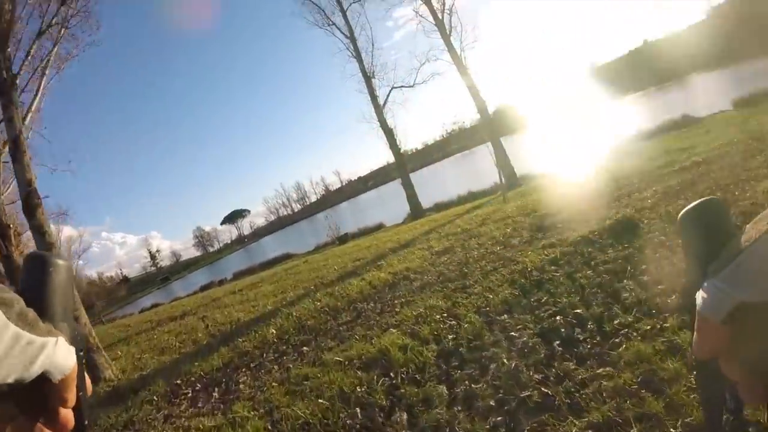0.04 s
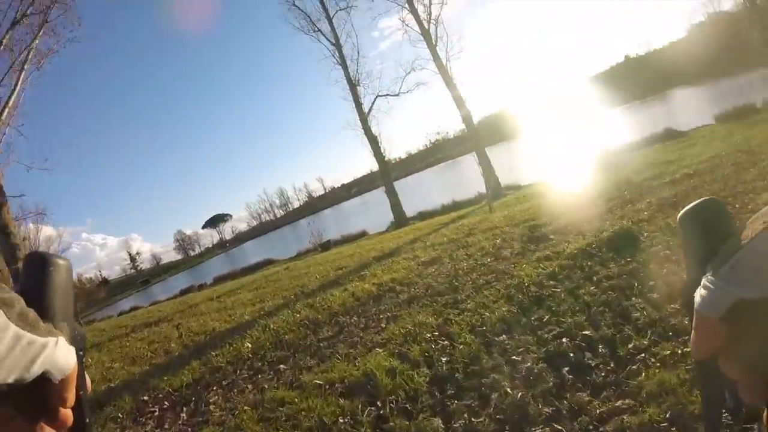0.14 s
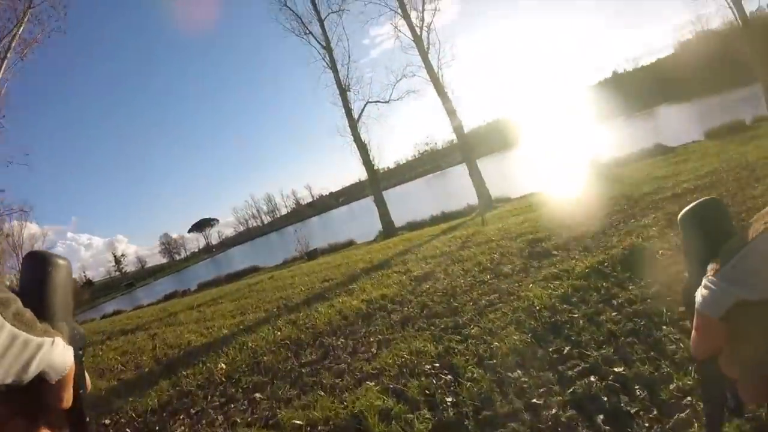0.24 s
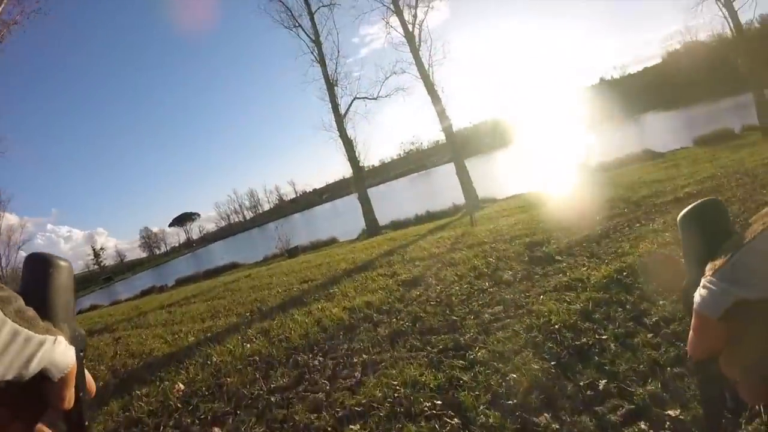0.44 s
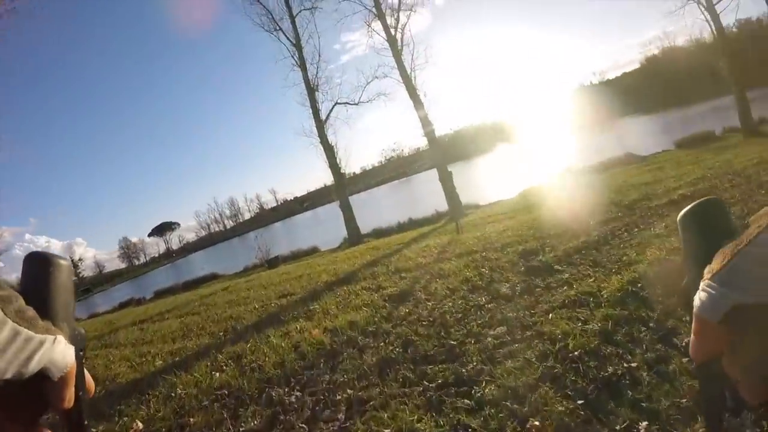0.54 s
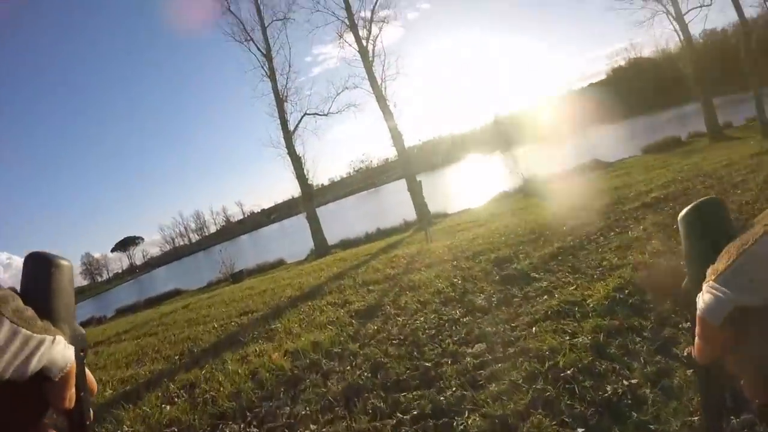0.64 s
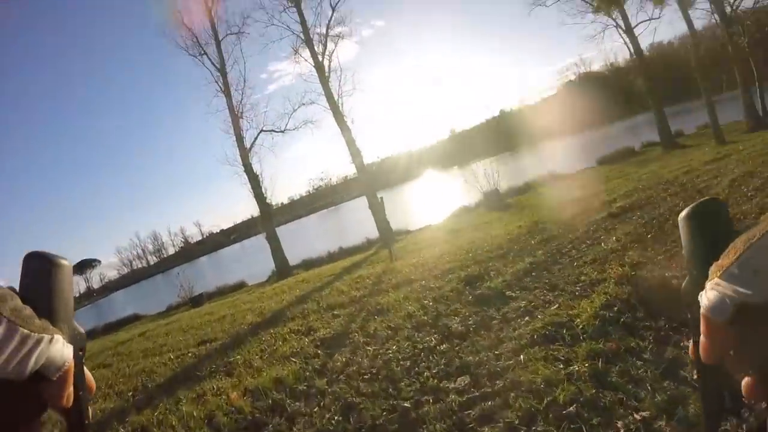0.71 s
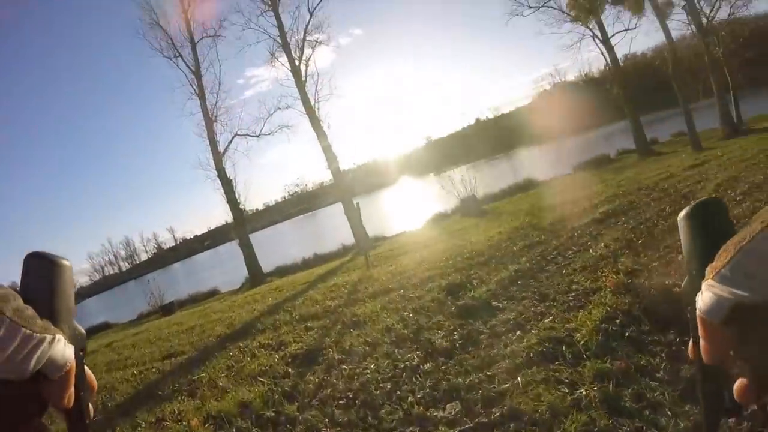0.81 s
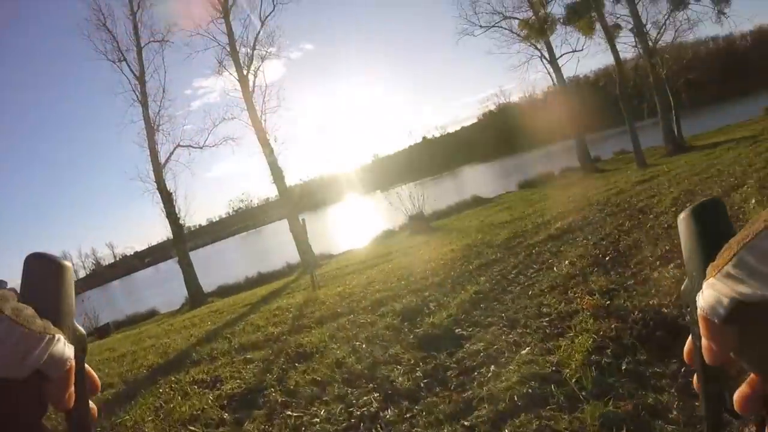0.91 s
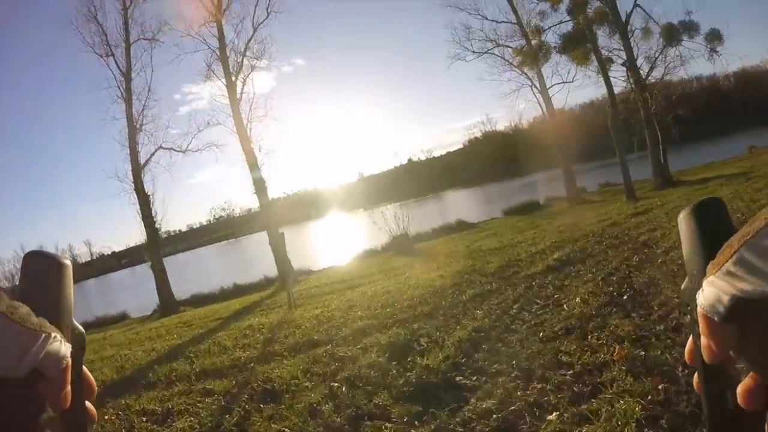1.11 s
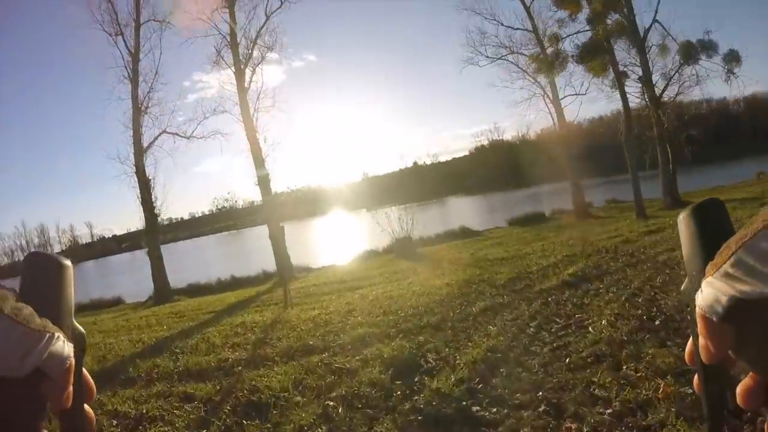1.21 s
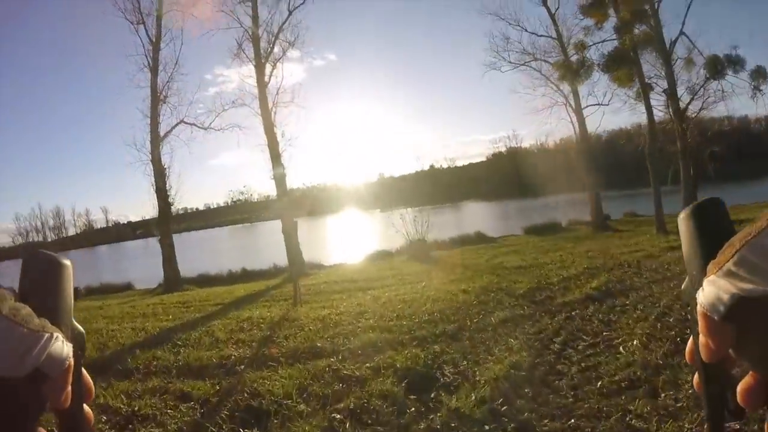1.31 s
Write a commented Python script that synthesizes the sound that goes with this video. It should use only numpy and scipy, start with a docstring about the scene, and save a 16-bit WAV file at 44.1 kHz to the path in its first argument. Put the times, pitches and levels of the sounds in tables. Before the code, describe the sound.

A bicycle rolls over bumpy grass. Dull thumps and a quick clatter of loose parts come first, then softer bumps with small snaps of leaves and twigs. Tyres and light wind rumble on a microphone carried by the rider.

```python
"""Bicycle on bumpy grass and dead leaves.

Heard from a camera in a closed case on the rider, all but mono. Bumps thump the camera mount and
knock loose parts of the bike. The tyres rumble, grass rustles, twigs and leaves snap.
Light wind rumbles on the case; a rubbing part whines faintly at the start."""
import sys
import numpy as np
from scipy import signal
from scipy.fft import rfft, irfft, next_fast_len
from scipy.io import wavfile
from scipy.ndimage import uniform_filter1d, map_coordinates

SR = 44100
rng = np.random.default_rng(int(sys.argv[2]) if len(sys.argv) > 2 else 0)


def generate_wav(signal):
    """Clip the signal to [-1, 1] and save it as 16-bit WAV at the path in sys.argv[1]."""
    frames = np.transpose(np.atleast_2d(signal))
    scaled = np.clip(frames, -1, 1) * 32767
    pcm = np.round(scaled).astype(np.int16)
    wavfile.write(sys.argv[1], SR, pcm)


N = 59535

# Mount swings. Each row: peak time in seconds, level in dB, pitch in Hz, rise and t60 in seconds.
MOUNT_THUMPS = [(0.121, -43, 132.8, 0.021, 0.28), (0.15, -43, 130, 0.012, 0.054),
                (0.2299, -29.5, 147.5, 0.013, 0.16), (0.289, -21.5, 135.4, 0.017, 0.12),
                (0.3941, -25.5, 140, 0.0071, 0.056), (.401, -29, 122.6, 0.0096, 0.063),
                (0.602, -43, 135, 0.0092, 0.11), (0.6985, -30.5, 132.2, 0.022, 0.11),
                (0.7813, -40, 134.2, 0.011, 0.092), (0.8506, -44, 142.5, 0.045, 0.068),
                (0.8959, -45, 123, 0.0076, 0.082), (0.9996, -40.5, 132.5, 0.0068, 0.077),
                (1.164, -53.5, 143.5, 0.042, 0.17), (1.248, -51.5, 123, 0.027, 0.15)]
# Loose parts. Each row: peak time in seconds, base level in dB, base pitch in Hz, rise in seconds.
PART_KNOCKS = [(0.2193, -19, 524, 0.0028), (.229, -33.5, 603, 0.0065), (.263, -39, 703, 0.0055),
               (.284, -30, 270, 0.0051), (.3035, -31.5, 848, 0.0031), (.3072, -36, 846, 0.0019),
               (0.3135, -31, 744, 0.0013), (0.316, -26, 324, 0.0035), (.3262, -33, 622, 0.0067),
               (.341, -37.5, 618, 0.0047), (0.384, -38.5, 490, 0.0085), (.5, -51, 594, 0.0053),
               (0.6716, -39, 666, 0.0046), (.799, -44, 780, 0.0051), (.884, -49.5, 833, 0.011),
               (.917, -47, 488, 0.0054), (.92, -45, 846, 0.003), (.936, -42, 790, 0.0012),
               (.957, -44, 660, 0.0068), (.971, -47.5, 462, 0.0062), (1.301, -51.5, 550, 0.0031)]
# Modes of a knock. Each row: pitch ratio, gain in dB, t60 in rise times.
KNOCK_MODES = [(0.621, -13, 4.8), (0.998, -4, 5.7), (1.45, -33, 9.4)]
# Twigs and leaves. Each row: start in seconds, peak in dB before the low-pass, pitch in Hz,
# resonance width over pitch.
TWIG_SNAPS = [(0.1965, -42.5, 5780, 0.34), (0.324, -52, 1257, 0.3), (0.3747, -63.5, 9500, 0.18),
              (.5395, -67, 9000, 0.66), (0.543, -47, 6450, 0.74), (0.5624, -53.5, 9400, 0.33),
              (0.6764, -41.5, 2020, 1), (0.732, -57, 4280, 0.27), (0.748, -57, 5370, 0.089),
              (0.8233, -52, 3600, 0.47), (0.845, -41, 3900, 0.92), (0.8526, -41.5, 5440, .9),
              (0.9459, -54, 2660, 0.15), (1.0581, -45.5, 3080, 0.12), (1.0579, -46.5, 3950, .5),
              (1.098, -52, 6700, 0.081), (1.1806, -45, 7040, 0.38), (1.1868, -42.5, 2340, 0.44),
              (1.208, -47.5, 3180, 1)]
# Grass blades. Each row: peak time in seconds, gain in dB, rise and fall time constants in seconds,
# low-pass in Hz.
BLADE_SWISHES = [(.002, -60.5, 0.014, 0.022, 13100), (0.203, -57.5, 0.017, 0.02, 7700),
                 (0.391, -74, 0.0079, 0.011, 12000), (0.541, -58.5, 0.0025, 0.018, 14700),
                 (0.621, -64.5, 0.0041, 0.0084, 13600), (0.685, -62, 0.0036, 0.0098, 12200),
                 (1.248, -60.5, 0.0059, 0.0069, 10200)]
# Rubbing tones. Each row: start in seconds, starting pitch in Hz, level in dB, rise and t60 in seconds.
WHINE_TONES = [(0, 815, -54, 0.048, 0.15), (.005, 1045, -63.5, 0.05, 0.28),
               (0.052, 1693, -76.5, 0.046, 0.56), (.1, 550, -51.5, 0.062, 0.11)]
# Noise envelopes. Each row: time in seconds, level in dB.
TYRE_ENVELOPE = [(0, -56.5), (.055, -59), (.105, -58.5), (.15, -62), (.2, -57), (.295, -54), (.325, -45.5),
                 (.372, -59.5), (.4, -53.5), (.44, -64.5), (.478, -80), (.51, -65.5), (.55, -60.5),
                 (.65, -60), (.7, -54), (.76, -64.5), (.81, -58.5), (.86, -59), (.95, -56.5), (1.005, -58),
                 (1.05, -69), (1.19, -62), (1.296, -72.5), (1.305, -59.5), (1.35, -66)]
RUSTLE_ENVELOPE = [(0, -74.5), (.12, -82), (.24, -78), (.4, -88), (.45, -96.5), (.52, -85), (.56, -71),
                   (.59, -76.5), (.674, -72), (.68, -57), (.73, -67.5), (.785, -69), (.835, -56),
                   (.87, -62), (.925, -65.5), (.975, -75), (1.05, -66), (1.11, -62), (1.155, -72),
                   (1.183, -58), (1.212, -67.5), (1.27, -71.5), (1.325, -85), (1.342, -63.5)]
WIND_ENVELOPE = [(0, -65.5), (.18, -61), (.24, -49.5), (.3, -43.5), (.36, -65), (.405, -46.5), (.5, -72.5),
                 (.72, -50.5), (.85, -60), (1.08, -65), (1.22, -59.5), (1.35, -63)]
# Noise colours. Each row: frequency in Hz, relative gain in dB.
TYRE_COLOUR = [(60, -30), (130, 7.5), (210, -4.5), (340, 1), (480, 4), (630, 1.5), (730, -1.5), (880, 2),
               (1050, -21.5), (1400, -24.5), (2500, -34), (6000, -87)]
RUSTLE_COLOUR = [(600, -0.5), (1200, -0.5), (2200, -0.5), (2900, 4.5), (5000, 0.5), (7300, 1.5),
                 (8600, -11.5), (10300, -6.5), (12000, -20), (14500, -18.5)]
SWISH_COLOUR = [(1500, -10.5), (3500, -13), (4300, -6), (5100, 5), (7200, -3), (8600, -7), (10300, -4),
                (12000, -18), (14500, -8)]
WIND_COLOUR = [(12, -24.5), (28, -10.5), (48, 1.5), (75, -6.5), (130, 1.5), (220, -20.5), (600, -71)]


def mount_thumps(overtone_ratio=2.25, overtone_db=-22, overtone_t60_s=0.14):
    """Each bump swings the camera mount at its low resonance, with a weak overtone."""
    out = np.zeros(N)
    for peak_s, db, hz, rise_s, t60_s in MOUNT_THUMPS:
        overtone = amp(overtone_db) * ring(peak_s, hz * overtone_ratio, rise_s, overtone_t60_s)
        out += amp(db) * (ring(peak_s, hz, rise_s, t60_s) + overtone)
    return out


def part_knocks(top_hz=1115):
    """Loose parts knock in damped modes, dulled on the way. Slow, rubbing contacts ring longer."""
    hits = np.zeros(N)
    for peak_s, db, hz, rise_s in PART_KNOCKS:
        for ratio, mode_db, t60_rises in KNOCK_MODES:
            hits += amp(db + mode_db) * ring(peak_s, hz * ratio, rise_s, rise_s * t60_rises)
    return filtered(hits, lambda f: 1 / np.sqrt(1 + (f / top_hz) ** 20))


def tyre_rumble(uneven_db=1.9):
    """Rough ground shakes the frame through the tyres: a dull, uneven rumble."""
    shaking = rng.standard_normal(N) * amp(uneven_db * wobble(90))
    return envelope(TYRE_ENVELOPE) * coloured(shaking, TYRE_COLOUR)


def twig_snaps(splinter_db=-11.5):
    """A twig or dry leaf breaks in a short burst: one resonance over a wideband crack."""
    out = np.zeros(N)
    for start_s, db, hz, width in TWIG_SNAPS:
        burst = rng.standard_normal(N) * strike(clock() - start_s, rise_s=0.00055, t60_s=0.01)
        band_hz = width * hz
        body = filtered(burst, lambda f: (1j * f * band_hz / (hz * hz - f * f + 1j * f * band_hz)) ** 2)
        snap = unit(body) + amp(splinter_db) * coloured(burst, RUSTLE_COLOUR)
        out += amp(db) * snap / np.abs(snap).max()
    return lowpass(out, top_hz=12900)


def leaf_rustle():
    """Leaves and grass crackle under the tyres."""
    return envelope(RUSTLE_ENVELOPE) * coloured(crackle(), RUSTLE_COLOUR)


def blade_swishes():
    """Grass blades brush past the wheel, some brighter than others."""
    t, out = clock(), np.zeros(N)
    blades = coloured(crackle(), SWISH_COLOUR)
    for peak_s, db, rise_s, fall_s, top_hz in BLADE_SWISHES:
        swell = np.exp(-np.maximum((peak_s - t) / rise_s, (t - peak_s) / fall_s))
        out += amp(db) * swell * lowpass(blades, top_hz)
    return out


def crackle(clumps_per_s=800, ticks_per_clump=4, clump_s=0.003, t60_s=0.007, tick_share=0.4):
    """Each crushed leaf gives a clump of tiny ticks ringing near its own pitch, over a soft hiss."""
    low_hz, high_hz, detune_octaves = 970, 11000, 0.6
    spread_db, flutter_db = 2.6, 0.76
    hiss = rng.standard_normal(N)
    flutter = amp(flutter_db * wobble(170))
    draws = rng.random((int(clumps_per_s * N / SR), ticks_per_clump + 1, 3))
    start, size, pitch = np.repeat(draws[:, 0], ticks_per_clump, axis=0).T[:, :, None]  # per leaf
    lag, detune, phase = draws[:, 1:].reshape(-1, 3).T[:, :, None]  # per tick
    age = np.arange(400)  # samples
    hz = (low_hz + pitch * (high_hz - low_hz)) * 2 ** (detune_octaves * (detune - 0.5))
    size_db = spread_db * np.minimum(-np.log(1 - size), 3)
    ticks = amp(size_db - 60 * age / SR / t60_s) * np.sin(2 * np.pi * (hz * age / SR + phase))
    onset = (start * N + lag * clump_s * SR).astype(int)
    ticking = np.bincount((onset + age).ravel(), ticks.ravel(), N)[:N]
    blend = np.sqrt(tick_share) * unit(ticking) + np.sqrt(1 - tick_share) * hiss
    return patchy(blend) * flutter


def patchy(x, depth_db=2):
    """The colour of a rustle shifts from tuft to tuft."""
    spectra = signal.stft(x, nperseg=256)[2]
    patches = uniform_filter1d(rng.standard_normal(spectra.shape), size=4, axis=0)  # over frequency
    patches = uniform_filter1d(patches, size=8, axis=1)  # over time
    return signal.istft(spectra * amp(depth_db * unit(patches)), nperseg=256)[1][:N]


def case_wind():
    """Air rumbles on the case, most when the rider is jolted."""
    return envelope(WIND_ENVELOPE) * coloured(rng.standard_normal(N), WIND_COLOUR)


def rub_whine(climb_per_s=0.65, waver_rad=1, rough_db=3):
    """Something on the bike rubs and sings briefly: faint, rough, rising in pitch."""
    out = np.zeros(N)
    for start_s, hz, db, rise_s, t60_s in WHINE_TONES:
        t = clock() - start_s
        phase = 2 * np.pi * hz * t * (1 + climb_per_s * t / 2) + waver_rad * wobble(110)
        out += amp(db + rough_db * wobble(110)) * strike(t, rise_s, t60_s) * np.sin(phase)
    return out


def ring(peak_s, hz, rise_s, t60_s):
    """One damped mode, loudest at peak_s."""
    t = clock() - peak_s
    return strike(t + rise_s, rise_s, t60_s) * np.cos(2 * np.pi * hz * t)


def strike(t, rise_s, t60_s):
    """Smooth rise from t = 0, then exponential decay."""
    attack = np.sin(np.pi / 2 * np.clip(t / rise_s, 0, 1)) ** 2
    return attack * amp(-60 * np.maximum(t - rise_s, 0) / t60_s)


def envelope(points):
    """Gain per sample from (s, dB) points."""
    return amp(np.interp(clock(), *np.transpose(points)))


def wobble(knots_per_s):
    """Smooth random curve."""
    return map_coordinates(rng.standard_normal(2048), [clock() * knots_per_s], mode="mirror")


def coloured(x, points):
    """x shaped by (Hz, dB) points, at rms 1."""
    hz, db = np.transpose(points)
    return unit(filtered(x, lambda f: amp(np.interp(np.log(f + 1), np.log(hz), db))))


def filtered(x, response):
    """x through a frequency response, a function of Hz."""
    size = next_fast_len(N + 8192)
    return irfft(rfft(x, size) * response(np.fft.rfftfreq(size, 1 / SR)), size)[..., :N]


def lowpass(x, top_hz):
    """Steep treble loss."""
    return signal.sosfilt(signal.butter(6, top_hz, fs=SR, output="sos"), x)


def amp(db):
    """Decibels to gain."""
    return 10 ** (np.asarray(db) / 20)


def unit(x):
    """Scaled to rms 1."""
    return x / np.sqrt(np.mean(x ** 2) + 1e-20)


def clock():
    """Seconds at each sample."""
    return np.arange(N) / SR


def scene(rustle_side_db=-36.5, wind_side_db=-50.5):
    """All sources centred, with a trace of width in rustle and wind."""
    mid = mount_thumps() + part_knocks() + tyre_rumble() + twig_snaps()
    mid += leaf_rustle() + blade_swishes() + case_wind() + rub_whine()
    side = amp(rustle_side_db) * leaf_rustle() + amp(wind_side_db) * case_wind()
    return np.array([mid + side, mid - side])


def record(dry):
    """The camera passes nothing above 15 kHz."""
    return filtered(dry, lambda hz: hz < 15000)


dry = scene()
out = record(dry)
generate_wav(out)
```